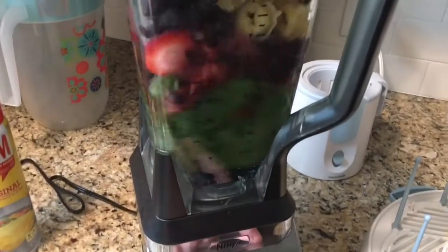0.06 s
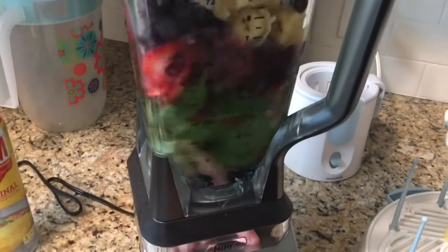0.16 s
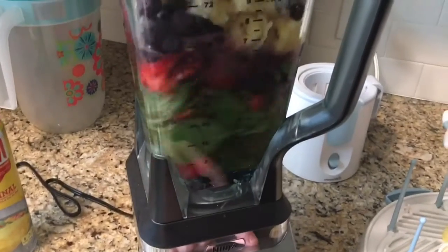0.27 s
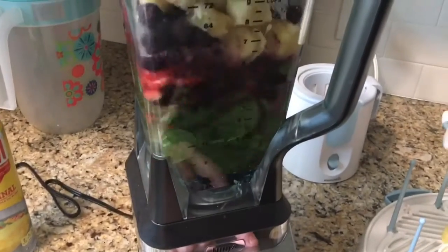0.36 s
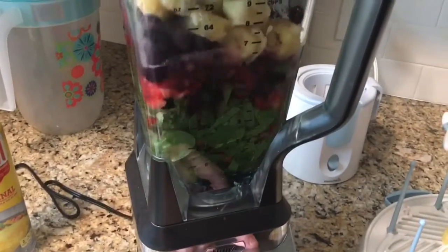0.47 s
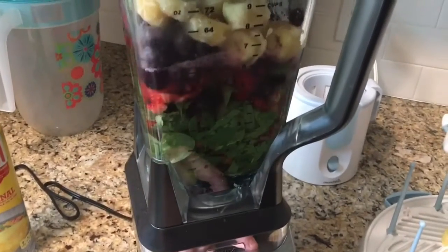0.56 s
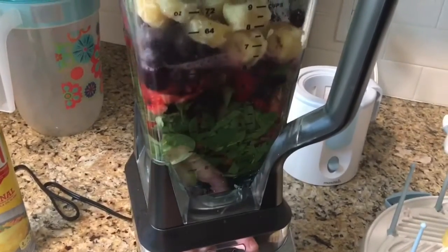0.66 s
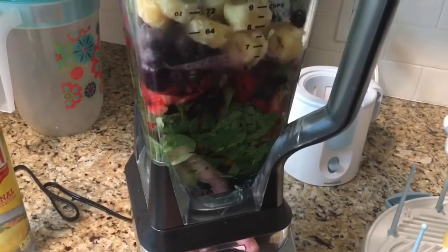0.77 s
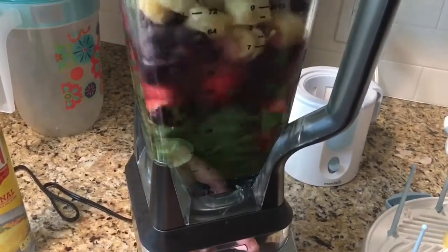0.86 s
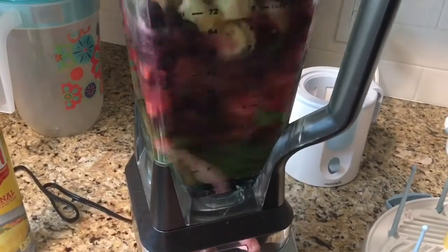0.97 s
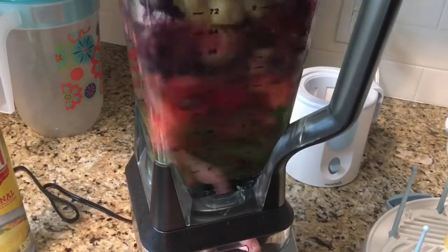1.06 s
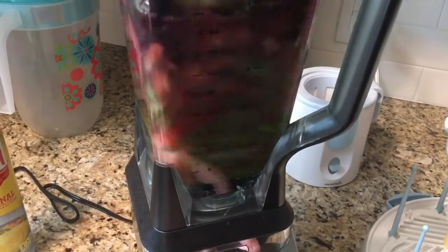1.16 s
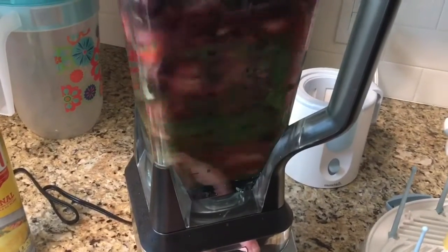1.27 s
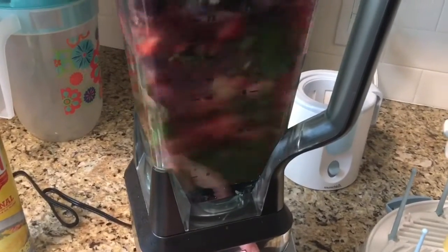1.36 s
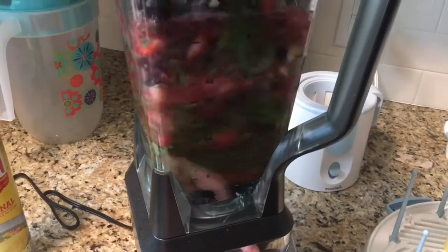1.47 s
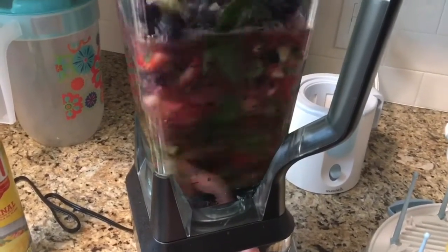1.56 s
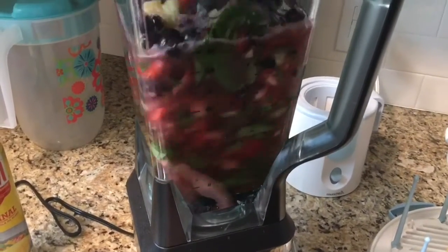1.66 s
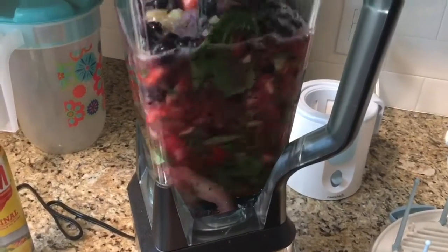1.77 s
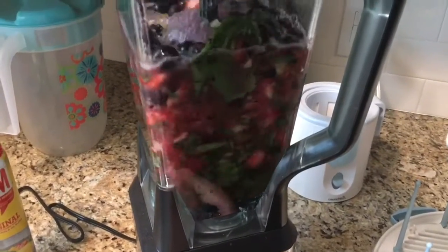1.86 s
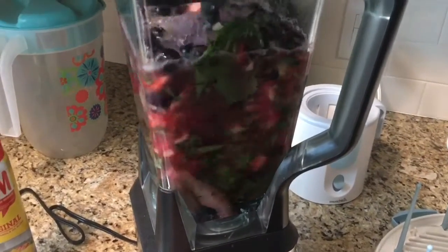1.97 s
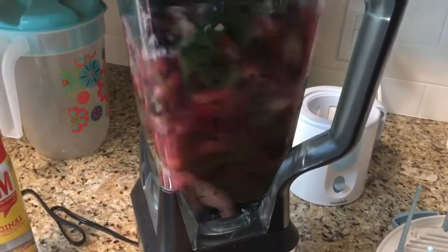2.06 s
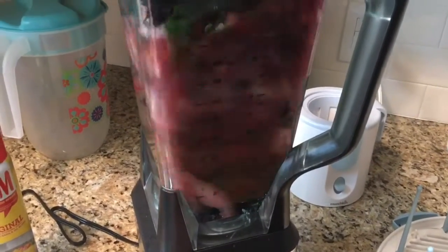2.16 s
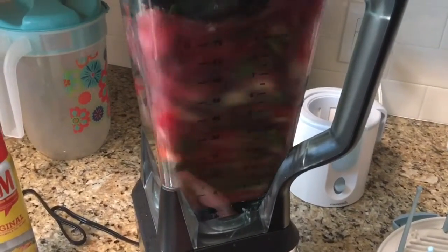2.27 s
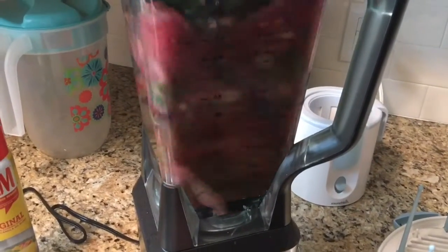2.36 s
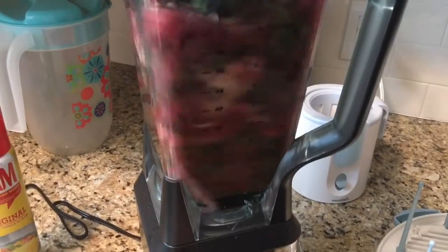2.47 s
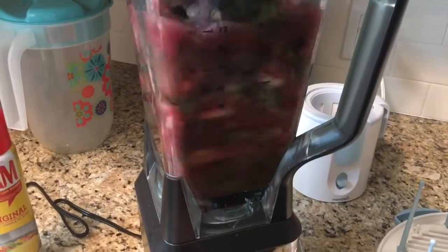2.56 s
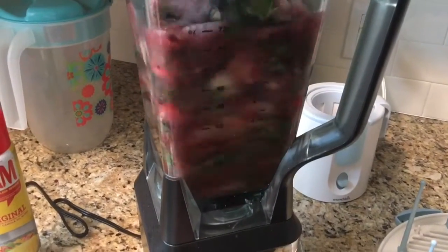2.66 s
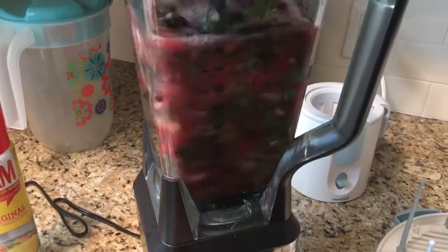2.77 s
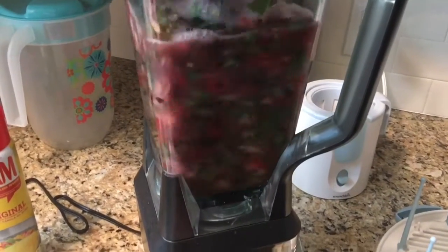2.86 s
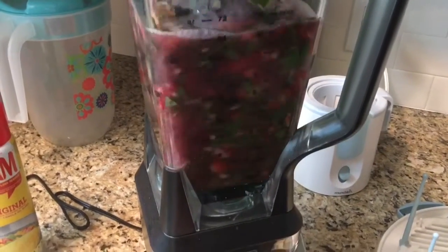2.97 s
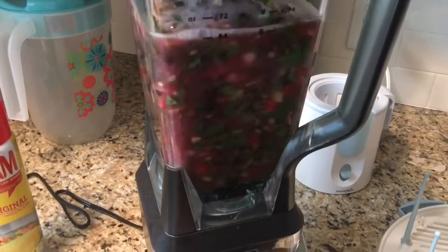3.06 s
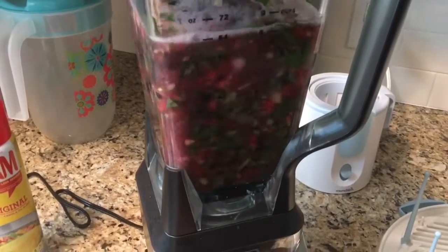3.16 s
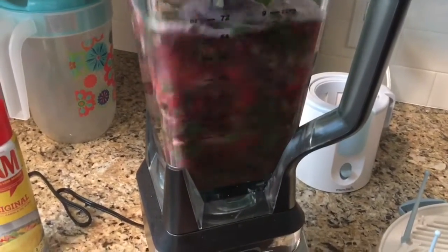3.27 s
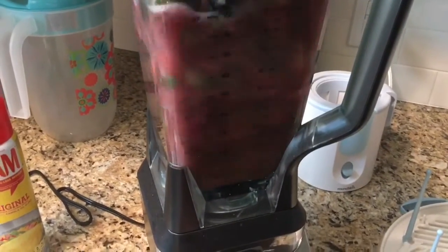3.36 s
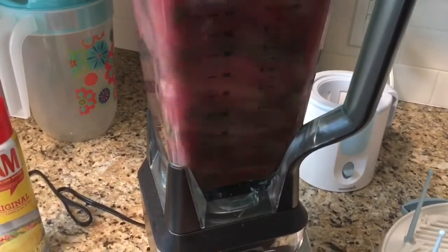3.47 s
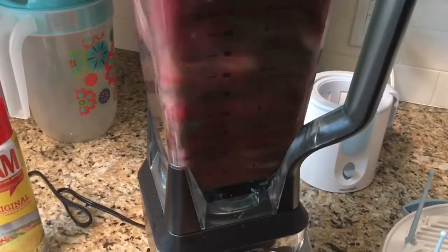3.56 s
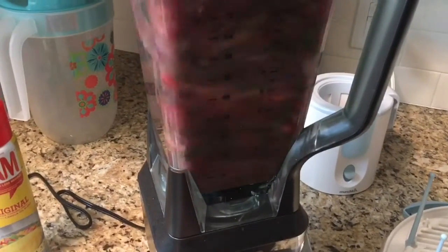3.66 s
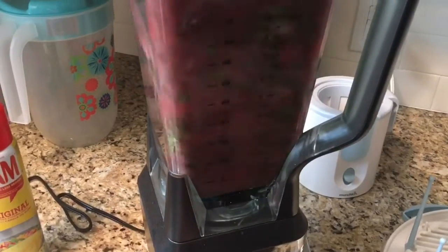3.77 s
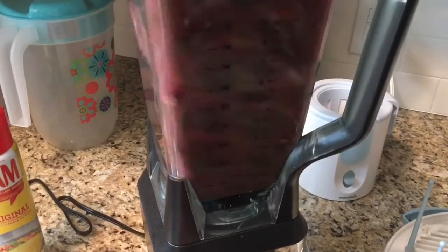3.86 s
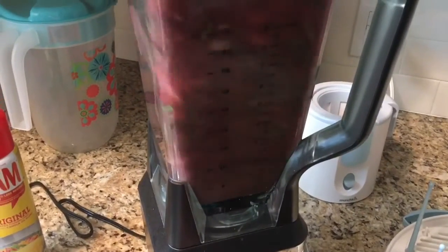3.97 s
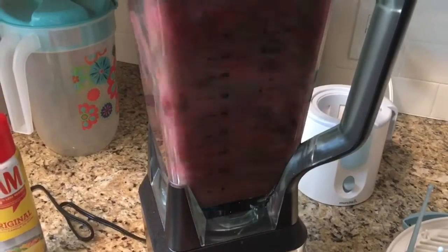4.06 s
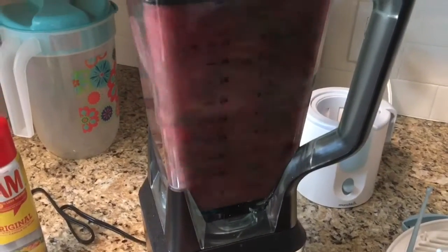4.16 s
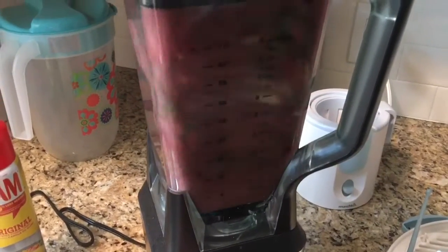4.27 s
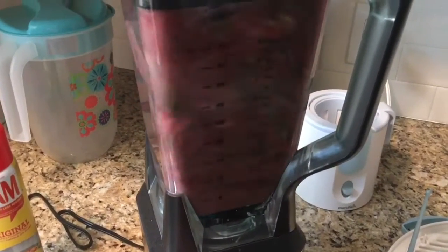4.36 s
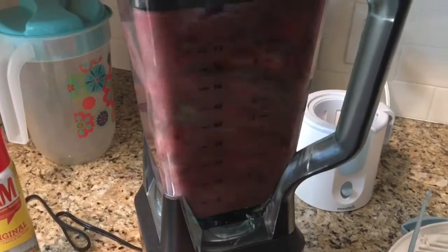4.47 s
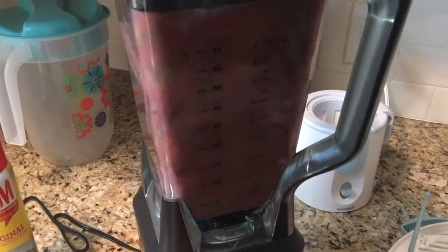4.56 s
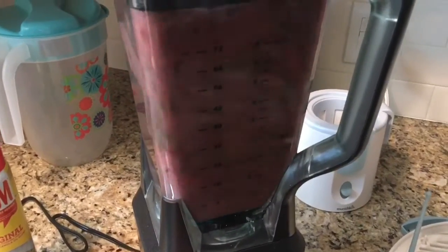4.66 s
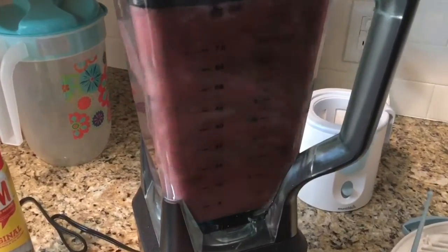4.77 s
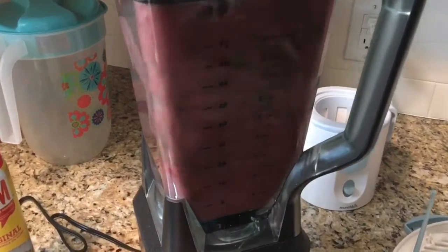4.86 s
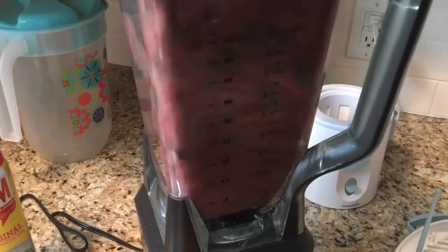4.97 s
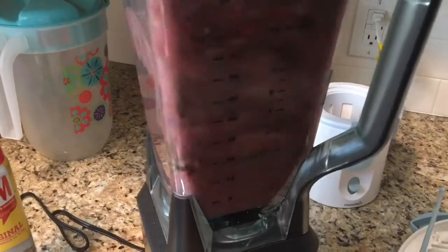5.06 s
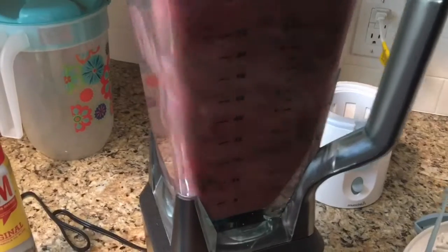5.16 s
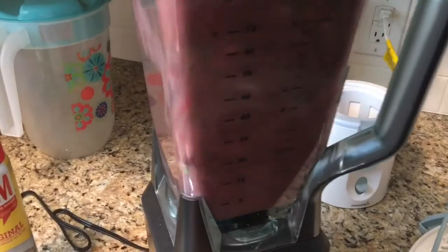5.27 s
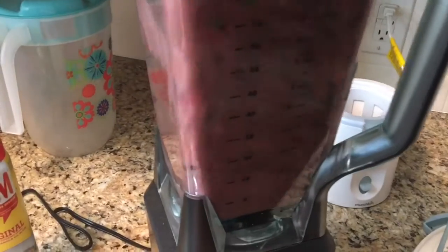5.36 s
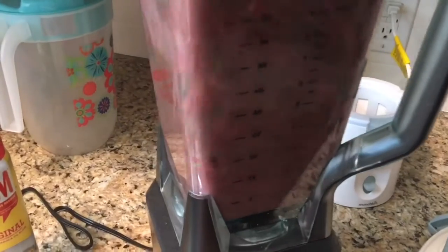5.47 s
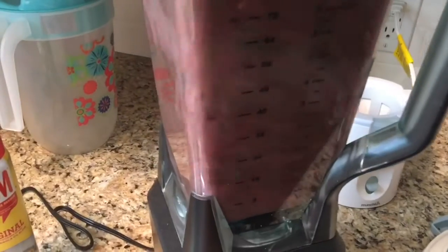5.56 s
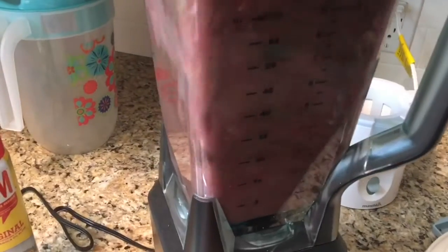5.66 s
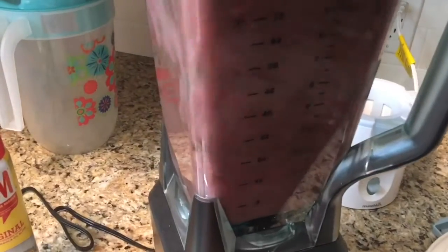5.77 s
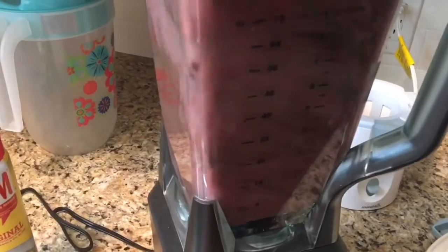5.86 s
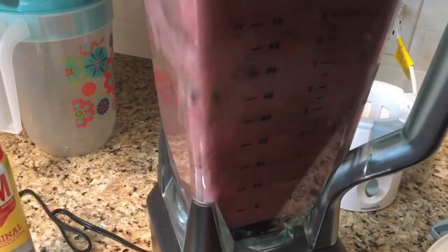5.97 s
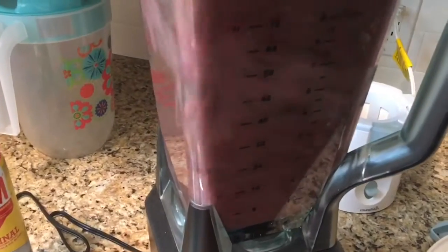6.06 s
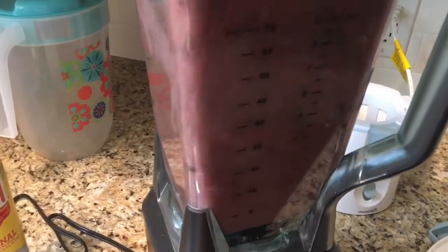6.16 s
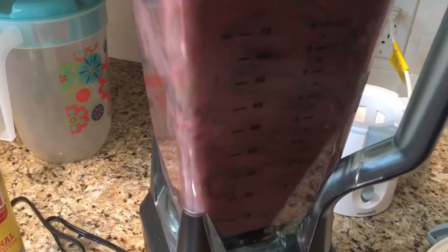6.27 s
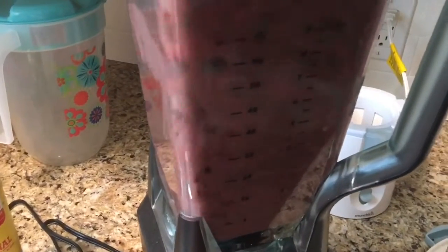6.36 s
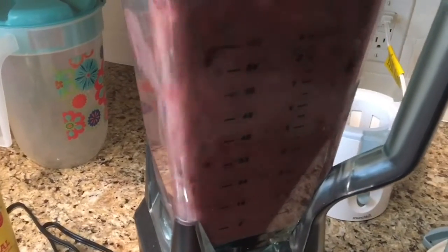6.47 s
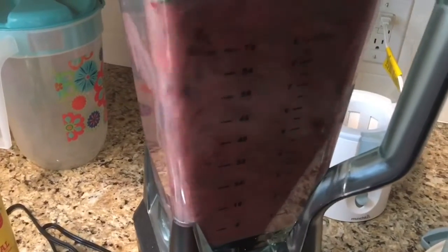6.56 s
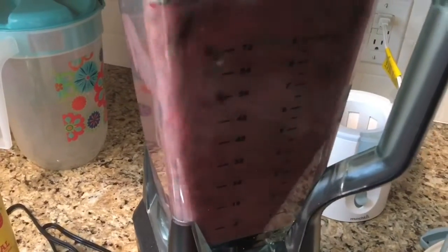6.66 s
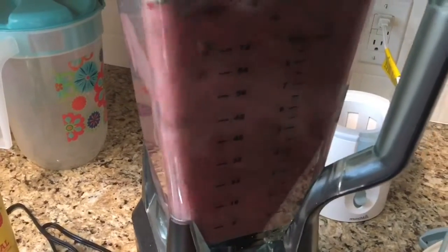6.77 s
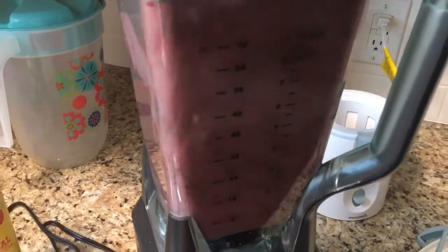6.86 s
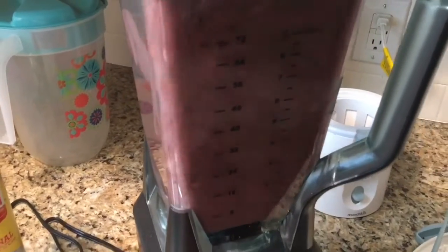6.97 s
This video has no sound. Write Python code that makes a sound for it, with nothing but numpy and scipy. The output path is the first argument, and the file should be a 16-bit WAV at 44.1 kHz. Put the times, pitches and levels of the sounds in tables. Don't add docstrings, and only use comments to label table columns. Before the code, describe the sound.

Close up in a hard kitchen, blender pulses whine and rattle with fruit lumps between clicks, then the motor stays on, smoothing into steady roar.

```python
import sys
import numpy as np
from scipy import signal
from scipy.fft import rfft, irfft, next_fast_len
from scipy.io import wavfile
from scipy.ndimage import uniform_filter1d

SR = 44100
rng = np.random.default_rng(int(sys.argv[2]) if len(sys.argv) > 2 else 0)


def inscribe(sig):
    pcm = np.round(np.clip(np.atleast_2d(sig).T, -1, 1) * 32767)
    wavfile.write(sys.argv[1], SR, pcm.astype(np.int16))


def attenuation_scalar(level_db):
    decades = np.asarray(level_db, float) / 20
    return 10 ** decades


N = 309132
TIME = np.arange(N) / SR
TEETH, PLANETS = 48, 3
FULL_SPEED = 50

# power on in s, power off in s, top speed in turns per s, standstill in s,
# coasting time constant in s
RUNS = [
    (-.35, -.15, 30, .51, 3),
    (.8435, 1.03, 42, 1.84, .52),
    (1.9955, 2.14, 38, 2.98, .5),
    (3.2135, 7.2135, 51.11, 8, .5),
]
# teeth clarity in dB, extra start jolt in dB, extra boom in dB
RUN_TONE = [
    (-9, -2, 2),
    (3.5, 1, -0.9),
    (4, 1.5, .1),
    (0.7, 6, 0.9),
]


def unit(x):
    return x / np.sqrt(np.mean(x ** 2))


def colour(x, filt):
    return signal.oaconvolve(x, filt)[:len(x)]


def response(points, peaks=(), lift=1):
    hz = np.maximum(np.arange(2049) * SR / 4096, 1)
    f, db = np.transpose(points)
    db = np.interp(np.log(hz), np.log(f), db)
    db = db + sum(lift * peak_db / (1 + (2 * (hz - centre) / width) ** 2) for centre, width, peak_db in peaks)
    cep = irfft(db * np.log(10) / 20)
    cep[1:2048] *= 2
    cep[2049:] = 0
    return irfft(np.exp(rfft(cep)))


def split(x):
    size = next_fast_len(N)
    spec = rfft(x, size)
    octave = np.log2(np.arange(size // 2 + 1) * SR / size + 1)
    below = [1 / (1 + np.exp(6 * (octave - np.log2(hz)))) for hz in (500, 1600, 6500)]
    below = [0] + below + [1]
    return [irfft(spec * (high - low), size)[:N] for low, high in zip(below, below[1:])]


def walk(rate):
    k = max(int(SR / 32 / rate), 3)
    held = rng.standard_normal(N // 96 + 2)[np.arange(N // 32 + 1) // k]
    slewed = uniform_filter1d(uniform_filter1d(held, k), k)
    return np.interp(TIME, np.arange(len(held)) * 32 / SR, 1.3 * slewed)


def ring(hz, t60, size=4000):
    t = np.arange(size) / SR
    return np.sin(2 * np.pi * hz * t) * np.exp(-np.log(1000) * t / t60)


def add(out, s, sound):
    i = int(s * SR)
    out[i:i + len(sound)] += sound[:N - i]


def spin(on, off, top, stop, coast):
    # share, time constant in s
    spin_up = [(11.15, .0134), (29.99, .1933), (10.56, 1.382)]

    def climb(t):
        return sum(share * (1 - np.exp(-np.maximum(t, 0) / tau)) for share, tau in spin_up)

    left = np.exp((off - stop) / coast)
    fall = (np.exp(np.minimum(off - TIME, 0) / coast) - left) / (1 - left)
    return top * climb(np.minimum(TIME, off) - on) / climb(off - on) * np.maximum(fall, 0)


def blender(speeds):
    # Hz, level in dB per Hz
    body = [(30, -50), (60, -15.5), (160, -8), (300, -1), (450, -4.5), (600, -7), (1300, -9.5), (2300, -6),
            (3500, -11.5), (6500, -11.5), (8000, -15), (10000, -16.5), (13000, -26.5), (16000, -31.5)]
    # centre in Hz, width in Hz, lift in dB
    housing = [(112, 55, 5), (207, 71, 4), (355.5, 19.4, 10), (432, 18, 7), (844, 47, 5), (1030, 26, 3),
               (1850, 240, 2.5), (2140, 230, 2.5), (2457, 64, 6), (2740, 52, 4.5), (3495, 720, 7),
               (4207, 290, 7), (4560, 95, 6), (4670, 120, 0.5), (5152, 250, 9), (5270, 30, 7.5),
               (6000, 630, 6.5), (6100, 50, 2), (6670, 240, 6), (6750, 190, -0.5), (7870, 170, 3),
               (8560, 200, 5), (10630, 120, 5), (10460, 720, -9.5)]
    # level at full speed in dB, dB per dB of speed, lift under power in dB, lift by lumps in dB,
    # start jolt in dB
    range_laws = [
        (-23.5, 1.05, 2.5, 6, 5),
        (-26, 0.88, 3, 7.5, -1.5),
        (-17, 1.04, 1, 0.5, -5.5),
        (-23.5, 1.62, 1.5, 2.5, -7),
    ]
    bite_db = [0.29, 0.089, 0.089, 0.079]
    power_fade_s, jolt_s, smoothing_s = 0.02, 0.045, 0.54
    settle_speed, settle_s = 1, 0.18
    kick_speed = 5.5

    speed = sum(speeds) * (1 + 0.0022 * walk(9))
    turns = np.cumsum(speed) / SR
    teeth = attenuation_scalar(1.5) * (speed / 50) ** 0.3 * gears(turns) + whine(turns, speed)
    roar = attenuation_scalar(17.0) * slurry(turns)
    roar = colour(roar, response(body, housing, lift=0.87))
    ranges = split(roar + colour(teeth, response(body, housing, lift=0.99)))

    lumps = np.exp(np.minimum(RUNS[-1][0] - TIME, 0) / smoothing_s)
    out = np.zeros(N)
    for (on, off, _, stop, _), run, run_db, (_, kick_db, boom_db) in zip(RUNS, speeds, bite_db, RUN_TONE):
        power = np.exp(np.minimum(off - TIME, 0) / power_fade_s)
        jolt = np.exp(-np.abs(TIME - on) / jolt_s)
        settling = settle_speed * np.exp(np.minimum(stop - TIME, 0) / settle_s)
        stir = np.hypot(run + kick_speed * jolt, settling)
        speed_db = 20 * np.log10(stir / FULL_SPEED)
        extra_db = [boom_db, 0, 0, 0]
        for part, law, more_db in zip(ranges, range_laws, extra_db):
            full_db, slope, power_db, lump_db, jolt_db = law
            db = full_db + run_db + more_db + slope * speed_db
            db = db + power_db * power + lump_db * lumps + (jolt_db + kick_db) * jolt
            out += (TIME > on) * attenuation_scalar(db) * part / np.std(part[-3 * SR:])
    return out * attenuation_scalar(-2.03 + 0.34 * walk(30) - 0.98 * lumps * walk(13))


def gears(turns):
    orders = [1, 2, 43, 47, 48, 49, 65, 93, 94, 96, 97, 99, 100, 101, 102, 130, 138, 139, 141, 144, 147,
              150, 156, 198, 199, 235, 240, 295]
    order_db = [0.5, -7, -5, -7.5, -12, -5, -11, -4, -6, -6, -12, -1, -3, -4, -5, -16, -5, -8, -9, -8, -9,
                -7, -10, -7, -7, -11, -11, -10]
    mesh_db = [-4, -8, -1, -4, -11]

    lines = np.zeros(N)
    for k, db in zip(orders, order_db):
        sway = 1 + 0.15 * walk(2.88)
        lines += attenuation_scalar(db) * sway * np.sin(2 * np.pi * (k * turns + rng.random()))

    k = np.arange(4097)
    off = np.abs((k + TEETH / 2) % TEETH - TEETH / 2)
    comb_db = -10 - 0.5 * off - k / 60 + 4 * (k % PLANETS == 0) + 4.5 * rng.standard_normal(len(k))
    phase = np.exp(2j * np.pi * rng.random(len(k)))
    turn = irfft(4096 * attenuation_scalar(comb_db) * (k > 3) * (k < 310) * phase)
    comb = np.interp(turns % 1, np.arange(8193) / 8192, np.append(turn, turn[0]))

    rough = np.zeros(N)
    for m, db in enumerate(mesh_db):
        rough += attenuation_scalar(db) * walk(300) * np.sin(2 * np.pi * TEETH * (m + 1) * turns)
    return lines + attenuation_scalar(-3.5) * comb + rough


def whine(turns, speed):
    # speed in turns per s, then level of each pair in dB
    crossings = [(4, -12, -4, 4, -20, -20), (9, -12, -2, 10, -20, -20), (14.5, -9, -10, 6, -20, -20),
                 (17.5, 13, -10, -4, -20, -20), (21, 1.5, -11, 2.5, -20, -20), (36, -3, -8, 7, -20, -20),
                 (41, -1.5, 5, 11, -20, -20), (43.8, -8, 13, 11, -20, -20), (45.6, -8, 6, 10, -18, -18),
                 (47.3, -8, 14, 10, -12, -3), (48.1, -9, 1.5, 9, -1.5, 4), (49.2, -15, -6, -1.5, 7, 4),
                 (50.2, -12, -5, -12, 8, -3), (51, -14, -3, -20, 7.5, -8)]
    pairs = [(48, 45), (96, 99), (144, 138), (102, 99), (105, 108)]
    # rate per s, depth from 0 to 1
    shifts = [(60, .6), (30, .25), (300, .8), (90, .35), (120, .6)]

    at, *level_db = np.transpose(crossings)
    starts = np.array(RUNS)[:, 0]
    run = np.searchsorted(starts, TIME) - 1
    rise = 1 - np.exp((starts[run] - TIME) / 0.09)
    clear = attenuation_scalar(np.array(RUN_TONE)[run, 0]) * rise
    tones = np.zeros(N)
    for pair, db, (rate, depth) in zip(pairs, level_db, shifts):
        level = attenuation_scalar(np.interp(speed, at, db) - 7.5)
        for k, share in zip(pair, (1, .6)):
            flutter = np.sqrt(.85 - depth ** 2) + depth * walk(rate)
            tones += share * level * flutter * np.sin(2 * np.pi * k * turns)
    return clear * tones


def slurry(turns):
    surge = attenuation_scalar(1.1 * np.cos(2 * np.pi * turns) + .6 * np.cos(2 * np.pi * PLANETS * turns))
    surge = surge * attenuation_scalar(.7 * walk(18))
    size_db = np.minimum(3 * rng.exponential(size=N), 9)
    strikes = rng.random(N) < 400 / SR
    bits = strikes * attenuation_scalar(size_db) * rng.uniform(-1.05, 1, N)
    bits = signal.lfilter([1], [1, -.75], np.diff(bits, prepend=0))
    chunks = attenuation_scalar(np.interp(TIME, [0, 3.4, 4.6, 7.01], [-2, -9.0, -13.0, -13.5]))
    return surge * rng.standard_normal(N) + chunks * unit(bits)


def knocks():
    # start in s, peak in dB, ring in Hz, brightness in dB
    pulsed = [(0.0634, -7, 2430, 8.5), (0.1347, -13.5, 1120, 13.5), (0.2032, -14, 2450, 7.5),
              (0.2243, -10, 1360, -12), (0.247, -9.5, 1620, -7), (0.2796, -12.5, 980, 2.5),
              (0.359, -15.5, 1240, 4), (0.8695, -4, 1320, -1.5), (0.9238, -2.5, 2060, 4),
              (0.961, -7, 1750, 7), (1.0236, -9, 2390, 2), (1.1138, -3.5, 2110, -18),
              (1.1355, -5, 1620, -21), (1.2944, -4, 2420, -9), (1.315, -4, 1510, 1.5),
              (1.3933, -0.5, 1720, -9), (1.4275, -9.5, 1300, -3.5), (1.5313, -13, 1230, -17),
              (1.679, -21, 1020, -10), (2.0338, -4, 1100, 3), (2.095, -3.5, 1520, 5),
              (2.1223, -2, 2080, -4), (2.2061, -5, 1910, 4.5), (2.249, -10, 1380, 1), (2.291, -15, 1230, 3),
              (2.332, -5.5, 1030, -2.5), (2.463, -14.5, 950, 4.5), (2.7047, -12.5, 930, -14),
              (2.761, -18, 1000, -5), (2.874, -25, 1040, -16)]
    # start in s, peak in dB, ring in Hz, brightness in dB
    running = [(3.2197, -9.5, 990, 3.5), (3.3194, -2.5, 2390, 2.5), (3.359, -8.5, 1180, 7.5),
               (3.4321, -2, 1670, 0.5), (3.471, -1, 1340, -13), (3.5778, 4.5, 1480, -12),
               (3.594, -4, 1850, -18), (3.6383, -2, 2120, -17), (3.684, -2, 2320, -1),
               (3.7213, -3, 1790, -15), (3.7531, 1.5, 1870, -5), (3.872, -2.5, 1900, -1),
               (3.9883, 2, 2150, -7), (4.0833, 2, 950, -4), (4.2994, -2.5, 2000, 0), (4.589, -0.5, 1310, 1),
               (5.2003, -2, 2400, -4), (5.367, 1.5, 2140, -5), (5.8294, -6, 2450, -2)]
    # Hz, level in dB
    crack_tone = [(300, -3), (1500, 7), (4000, 3.5), (8000, -2.5), (11000, -10.5), (16000, -19.5)]

    out, t = np.zeros(N), np.arange(4000) / SR
    wall_colour = response(crack_tone)[:256]
    rattle = (1 - np.exp(-t / 0.00032)) * (np.exp(-t / 0.0022) + 0.39 * np.exp(-t / 0.017))
    for s, db, hz, bright_db in pulsed + running:
        spread = rng.uniform(1.25, 2.55, 3)
        wall = ring(hz, 0.028) + .5 * sum(ring(hz * r, 0.011) for r in spread) + 0.35 * ring(392, 0.019)
        crack = colour(rng.standard_normal(len(t)) * rattle, wall_colour)
        add(out, s, attenuation_scalar(db - 7.5) * (wall + attenuation_scalar(bright_db + 0.5) * crack))
    return out


def thuds():
    # start in s, peak in dB, ring in Hz
    blows = [
        (.008, -10.5, 1044),
        (.105, -9, 430),
        (.14, -7.5, 423),
        (.17, -10.5, 435),
        (.86, -12, 351),
        (0.971, -5, 385),
        (2.245, -9, 445),
        (3.219, -13.5, 330),
        (3.25, -16, 490),
        (3.277, -6.5, 350),
    ]
    out, t = np.zeros(N), np.arange(4000) / SR
    t60 = 0.053
    rise = 1 - np.exp(-t / 0.0015)
    for s, db, hz in blows:
        floor = ring(hz, t60) + .6 * ring(1.45 * hz, 0.73 * t60)
        add(out, s, attenuation_scalar(db) * rise * floor)
    return out


def relay():
    # start in s, case level in dB, clack level in dB
    snaps = [
        (0.725, -28, -31.5),
        (1.881, -27.5, -33.5),
        (3.093, -40, -20.5),
    ]
    # start in s, peak in dB
    buzzes = [
        (0.786, -21.5),
        (1.802, -21.5),
        (1.936, -21.5),
        (3.045, -42),
        (3.154, -20.5),
    ]
    # Hz, level in dB, t60 in s
    case_modes = [(1066, 4, 0.1), (1340, 9, 0.057), (2120, -13, 0.2), (3350, -12, 0.11), (5500, -29, 0.047),
                  (5770, -4, 0.064), (6000, -28, 0.03), (7740, -4, 0.034)]
    # Hz, level in dB per Hz
    clack_tone = [(290, -55), (500, -20), (974, 1), (1720, -13), (2160, -5), (4150, -16.5), (7000, -14.5),
                  (10500, -34), (16000, -38)]
    # Hz, level in dB per Hz
    buzz_tone = [(300, -22), (1300, 0), (1800, -6), (2480, -4.5), (3300, -10), (4370, -4.5), (6200, -14.5),
                 (7950, -10.5), (11000, -23), (16000, -18)]

    out, t = np.zeros(N), np.arange(4000) / SR
    case = sum(attenuation_scalar(db) * ring(hz, 0.65 * t60) for hz, db, t60 in case_modes)
    fade = 0.31 * np.exp(-t / 0.0052) + 0.63 * np.exp(-t / 0.012)
    for s, case_db, clack_db in snaps:
        clack = unit(colour(rng.standard_normal(len(t)), response(clack_tone)))
        add(out, s, attenuation_scalar(case_db - 5.5) * case + attenuation_scalar(clack_db - 1.0) * fade * clack)
    swell = t / 0.01 * np.exp(1 - t / 0.0068)
    for s, db in buzzes:
        hiss = unit(colour(rng.standard_normal(len(t)), response(buzz_tone)))
        add(out, s, attenuation_scalar(db - 14.0) * hiss * swell)
    return out


def counter(speed):
    own_speed, width = 48.7, 0.86
    sos = signal.butter(2, [43, 57], "band", fs=SR, output="sos")
    band = signal.sosfilt(sos, rng.standard_normal(N))
    peak = attenuation_scalar(-46.5) / (1 + ((speed - own_speed) / width) ** 2)
    shake = attenuation_scalar(-41.5) * (speed / FULL_SPEED) ** 0.57
    return unit(band) * (attenuation_scalar(-53) + shake + peak)


def walls(near):
    t60 = 0.23
    t = np.arange(SR // 2) / SR
    echo = rng.standard_normal(len(t)) * np.exp(-np.log(1000) * t / t60) * (t > .004)
    echo = signal.lfilter([1], [1, -.4], echo)
    return attenuation_scalar(-14.5) * colour(near, echo / np.linalg.norm(echo))


def kitchen():
    # Hz, level in dB per Hz
    hum_tone = [(25, -2), (50, 0), (80, 10), (144, 0.5), (382, 2), (680, -10.5), (1400, -32.5), (2910, -33),
                (6330, -48), (10400, -33), (16000, -53)]
    hum = unit(colour(rng.standard_normal(N), response(hum_tone)))
    return hum * attenuation_scalar(-45 + 1.9 * walk(4.4))


def scene():
    speeds = [spin(*run) for run in RUNS]
    near = blender(speeds) + knocks() + thuds() + relay()
    mix = near + walls(near) + kitchen() + counter(sum(speeds))
    return np.tile(mix, (2, 1))


def top_cut(x):
    return signal.sosfilt(signal.butter(12, 16990, fs=SR, output="sos"), x)


def record(dry):
    mic = signal.sosfilt(signal.butter(2, 38, "high", fs=SR, output="sos"), dry)
    mic = np.tanh(.95 * mic) / .95
    mic = signal.sosfilt(signal.ellip(10, .3, 80, 15850, fs=SR, output="sos"), mic)
    return top_cut(mic)


dry = scene()
out = record(dry)
inscribe(out)
```